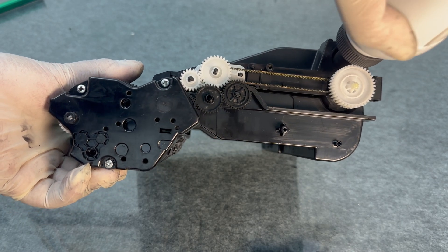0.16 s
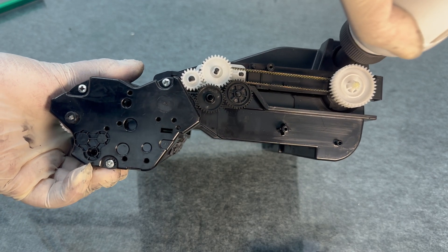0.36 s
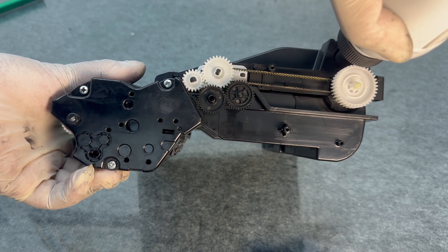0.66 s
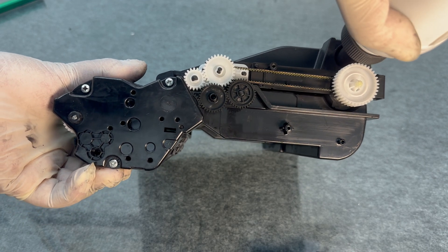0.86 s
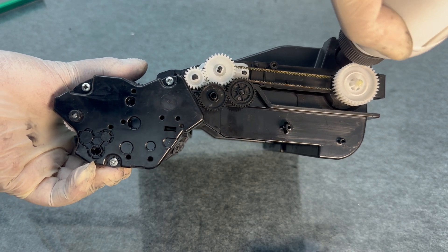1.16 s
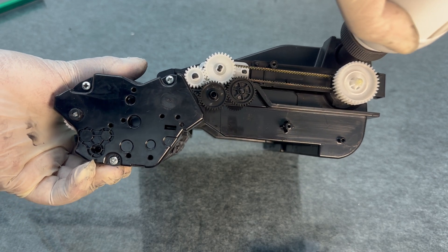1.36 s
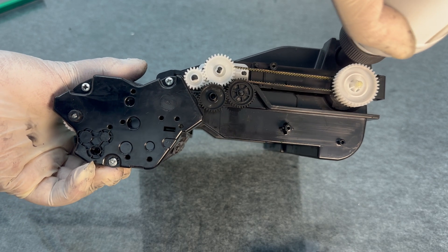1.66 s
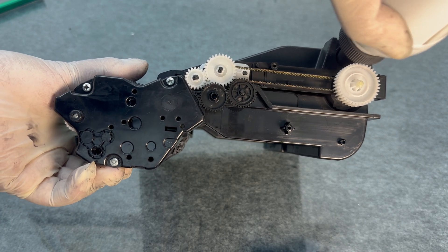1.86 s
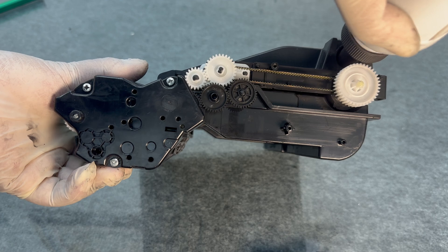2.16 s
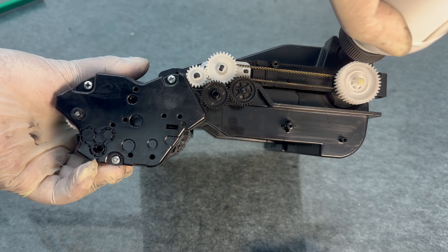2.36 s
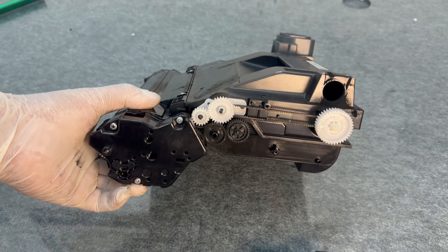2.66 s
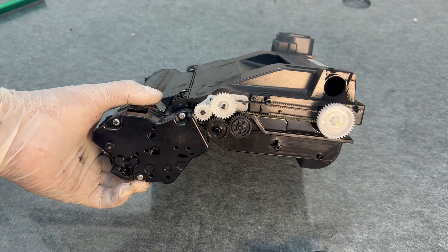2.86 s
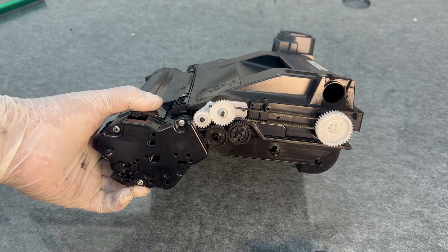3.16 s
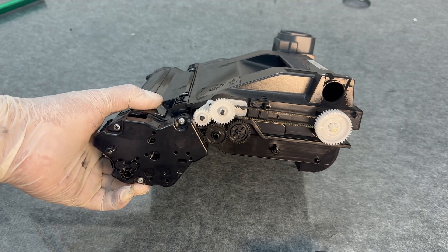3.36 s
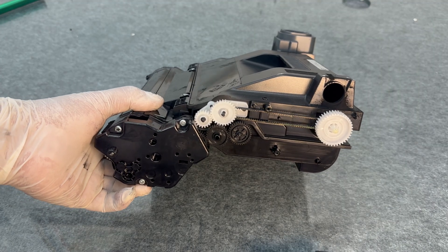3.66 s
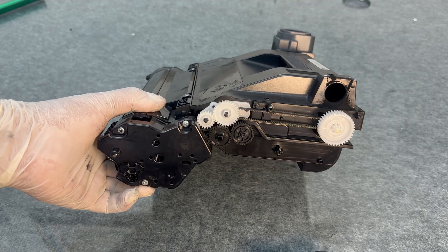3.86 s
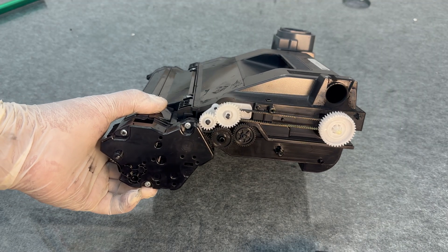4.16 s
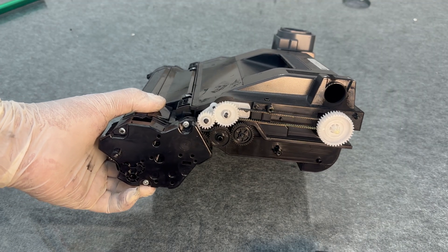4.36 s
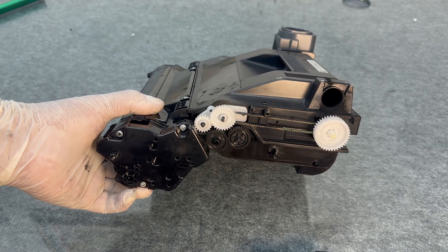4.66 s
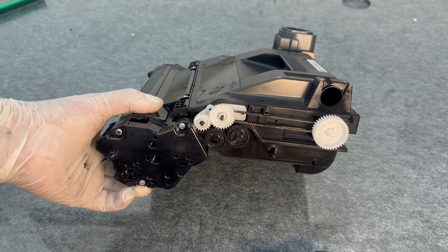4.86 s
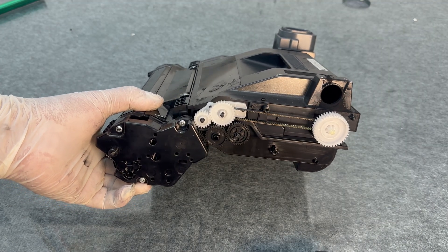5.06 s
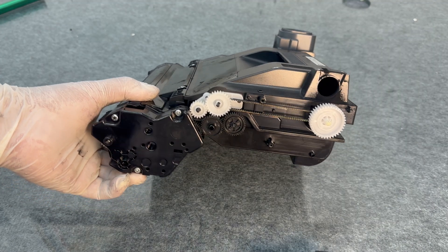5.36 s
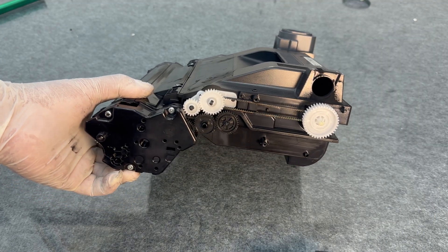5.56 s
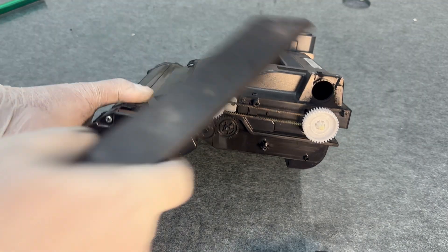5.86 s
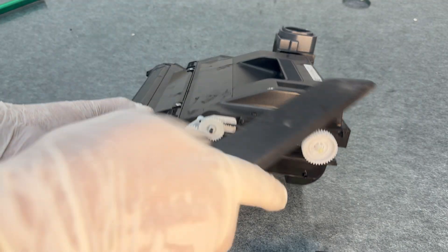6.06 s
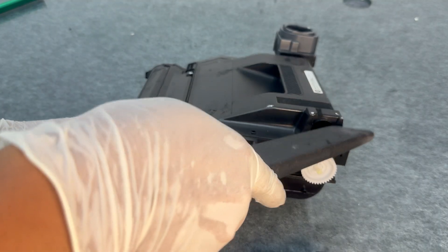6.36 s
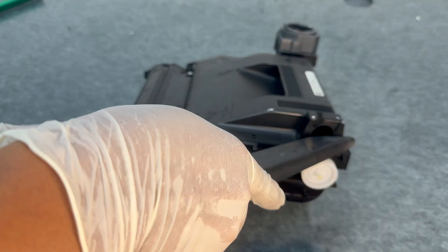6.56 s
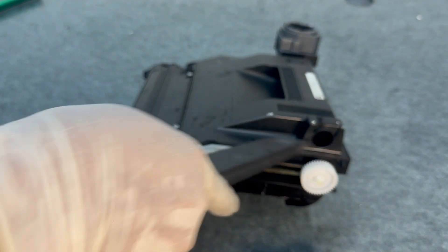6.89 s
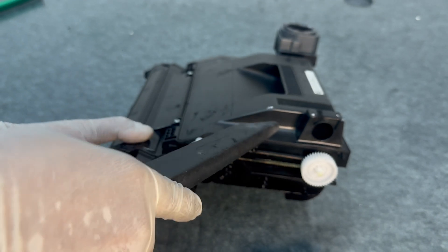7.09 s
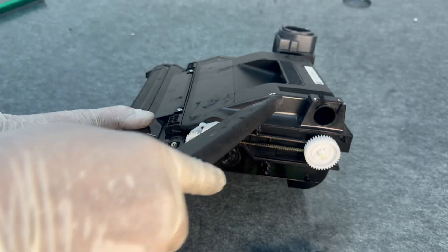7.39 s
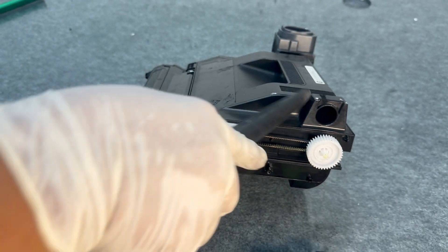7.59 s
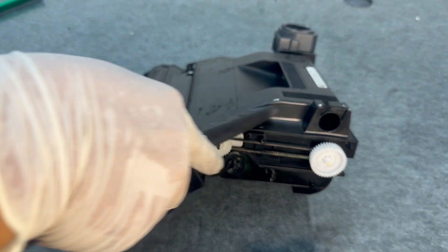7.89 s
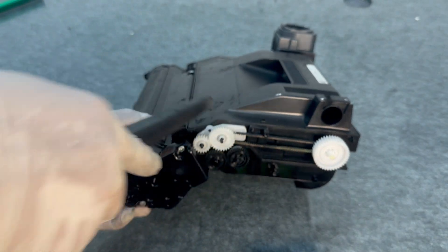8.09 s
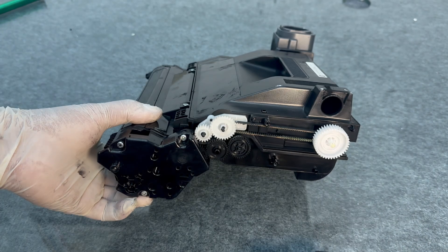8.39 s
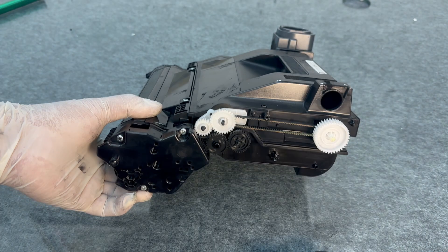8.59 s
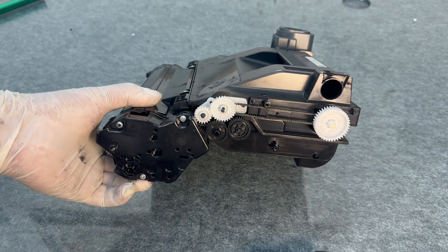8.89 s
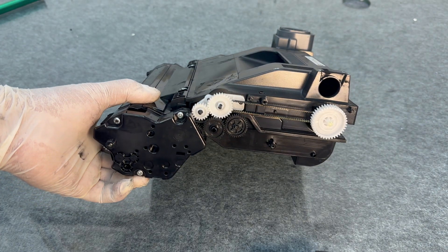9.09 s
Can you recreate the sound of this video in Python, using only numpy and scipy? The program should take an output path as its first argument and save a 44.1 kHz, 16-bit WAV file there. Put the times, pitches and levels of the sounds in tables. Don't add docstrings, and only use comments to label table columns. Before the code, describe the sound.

A close mono microphone in a quiet, slightly reflective small room. From 0 to 2.5 seconds a finger taps a hollow plastic bottle quickly, about eight times a second, hard and soft, with small rebounds, low airy thuds and fine powder rattling; taps weaken around 1 second, then strengthen. The tapping stops dead at 2.5. Faint room hush follows, with soft dull knocks near 3.2 and 3.8. At 4.1 a switch clunks and a small vacuum motor spins up, its hum and whine climbing for about a second amid roaring, hissing air; a small bump lands at 4.8. The hiss grows brighter as the nozzle approaches. At 6.6 to 6.9 it sucks on an edge with a breathy whistle, slides along, then at 7.7 chokes harder with a rapid fluttering squeal, fading by 8. The airflow softens as it lifts away, with a hollow bump at 9.1 while the motor still runs.

```python
import sys
import numpy as np
from scipy import signal
from scipy.fft import rfft, irfft, next_fast_len
from scipy.io import wavfile
from scipy.ndimage import uniform_filter1d, map_coordinates

SR = 44100
rng = np.random.default_rng(int(sys.argv[2]) if len(sys.argv) > 2 else 0)


def volts_from_db(level):
    exponent = np.asarray(level, float) / 20
    return 10 ** exponent


def master_out(mix):
    frames = np.transpose(np.atleast_2d(mix))
    ceiling = np.clip(frames, -1, 1)
    pcm = np.round(ceiling * 32767).astype(np.int16)
    wavfile.write(sys.argv[1], SR, pcm)


N = 407043

# start_s, shell_db, thud_under_shell_db (a flatter finger gives more thud)
STRIKES = [(0.268, -37.5, -10), (0.405, -43, -9), (0.5298, -42, -13), (0.662, -42.5, -11),
           (0.7893, -44.5, -11.5), (0.918, -50, -8), (1.049, -48.5, -13), (1.159, -42, -9),
           (1.292, -39.5, -11.5), (1.4276, -40, -10), (1.5551, -40.5, -9.5), (1.827, -40.5, -10.5),
           (1.955, -40, -9.5), (2.0884, -40, -9.5), (2.2258, -37.5, -11.5), (2.36, -40.5, -10)]
# start_s, shell_db
REBOUNDS = [(0.0014, -58.5), (0.1183, -59), (0.193, -50.5), (0.3349, -45.5), (0.471, -56), (0.583, -60),
            (0.72, -55), (0.828, -63), (0.963, -60), (1.093, -53), (1.22, -50.5), (1.361, -54.5),
            (1.488, -52.5), (1.619, -58), (1.751, -55.5), (1.8843, -54), (2.0294, -57.5), (2.155, -47),
            (2.2975, -53), (2.43, -54.5)]
# delay_s, level_db
BOTTLE_BOUNCES = [
    (0.0009, -0.5),
    (0.0059, -1.5),
    (0.0092, -1),
]
# pitch_hz, width_hz, level_db
BOTTLE_WALL = [(548, 26, -3), (906, 51, 1.5), (1263, 102, -6.5), (1610, 110, -5.5), (1880, 232, 1),
               (2075, 336, 2.5), (2356, 190, 1), (2530, 190, -1.5)]
# pitch_hz, width_hz, level_db
UPPER_WALL = [(3000, 350, -5.5), (3740, 360, -4), (4320, 420, -11.5), (5530, 1100, -10),
              (8000, 1200, -31.5)]
# pitch_hz, width_hz, level_db
BOTTLE_AIR = [(130, 45, 2), (206, 100, -1), (360, 138, 1), (534, 40, -14.5)]
TAPPING_ENDS_S = 2.465

SWITCH_ON_S, TOP_SHAFT_HZ = 4.1, 374.6
# missing_hz, time_constant_s
RUN_UP = [
    (177.54, 0.19),
    (134.5, 0.55),
]
# time_s, unbalance_db, low_tones_db, fan_over_low_tones_db
MOTOR_LEVELS = [(4.1, -85.5, -80, -9), (4.24, -60, -64, -9), (4.3, -63, -61, 1), (4.38, -64, -43, -4.5),
                (4.48, -47.5, -50.5, 5.5), (4.68, -45.5, -51.5, -1.5), (4.84, -47, -52, 4),
                (4.98, -38, -48, -1), (5.22, -44, -58, 0), (5.36, -40, -61.5, 8), (5.52, -49.5, -56, -9),
                (5.75, -56, -60, 9), (5.95, -63, -60, -4), (6.12, -58, -59, 3), (6.3, -50.5, -56.5, 7),
                (6.5, -50, -52, 2), (7.0, -46.5, -61, -3), (8.2, -47.5, -56, -2), (8.5, -49.5, -61, -20),
                (9.23, -50, -51, -10.5)]
# multiple_of_shaft, level_db
LOW_ORDERS = [(3, -4.5), (4, -12)]
# multiple_of_shaft, level_db
BLADE_ORDERS = [(8, -14), (9, -0.5)]
# time_s, second_order_db, bearing_db
WARBLE = [(4.25, -75, -80), (4.38, -50, -75), (4.47, -60, -70), (4.62, -50.5, -62), (4.72, -54, -58),
          (4.82, -53, -51), (4.92, -60, -58), (5.04, -59, -47), (5.2, -63, -60), (5.4, -69, -64),
          (5.8, -66, -65.5), (6.5, -59, -58), (7.6, -81, -59), (8.2, -72, -55.5), (9.23, -68, -66)]
# time_s, level_db
VANES = [(4.16, -80), (4.3, -70), (4.36, -60), (4.43, -66), (4.51, -56), (4.58, -63), (4.7, -64),
         (4.8, -60), (4.92, -55), (5.07, -53), (5.12, -64), (5.3, -85)]
# pitch_hz, width_hz, level_db
HOUSING = [(487, 40, -2), (646, 18, 12), (856, 20, 9.5), (915, 18, 8), (960, 22, 5), (1106, 54, 3),
           (1680, 50, 15), (2304, 34, 10), (2730, 580, 2.5), (2885, 140, 11.5), (3250, 270, 6),
           (3900, 290, 8), (5200, 150, -11)]

# time_s, nozzle_nearness_db, exhaust_nearness_db, nozzle_aim_at_microphone_db
AIRFLOW = [(4.1, -64, -65, 0), (4.18, -65, -49.5, -3), (4.23, -64, -56.5, 3), (4.31, -62.5, -55.5, 3.5),
           (4.58, -56, -56, -1), (4.84, -53, -54, -2.5), (5.0, -49, -54.5, -1.5), (5.4, -51, -56, -2),
           (5.76, -51, -54, 2), (6.2, -48, -49, 2), (6.5, -45.5, -49, -4.5), (7.0, -47.5, -51.5, -1.5),
           (7.2, -45, -50.5, -0.5), (7.66, -48.5, -49.5, 2), (8.03, -44.5, -49.5, 4), (8.21, -48, -53, 2.5),
           (8.7, -51, -54.5, 1), (9.23, -55, -56.5, -1)]
# pitch_hz, level_db_per_hz
ROAR = [(35, -49), (60, -17), (319, -3.5), (375, -5), (417, -2.5), (569, -6.5), (818, -10.5), (1100, -11),
        (1230, -15), (1500, -22), (1950, -40), (3300, -120)]
# pitch_hz, level_db_per_hz
RUSH = [(700, -12.5), (1000, -2), (1250, -1.5), (1500, -4.5), (1850, -1.5), (2400, -1.5), (3100, -8),
        (4200, -7.5)]
# pitch_hz, level_db_per_hz
HISS = [(1800, -27), (2800, 3), (3500, 0.5), (5000, 1.5), (6500, 0.5), (8500, -5), (11000, -22),
        (14000, -44)]
# pitch_hz, level_db_per_hz
FIZZ = [(6500, 1), (8500, 4), (11000, -1), (13000, -7), (16000, -36)]
# pitch_hz, level_db_per_hz
SHEEN = [(11500, -23), (13000, -4), (15000, -1), (16500, -10)]
# pitch_hz, width_hz, level_db
HOSE = [(457, 58, 0.5), (677, 150, -3), (863, 49, 3), (1110, 61, -1), (1360, 70, -7), (1740, 160, -3.5),
        (2120, 70, -10.5), (2520, 92, -4), (3000, 120, -15), (3350, 110, -3.5), (4240, 175, -4.5),
        (4850, 90, -12.5), (5560, 130, -12.5), (6360, 83, -10)]

# time_s, whistle_db, gap_shape (0 early, 1 late), choke_db
FIRST_SUCK = [(6.55, -73, 0.084, 3), (6.6, -49, 0.017, 6), (6.63, -36.5, 0.015, 9), (6.67, -33, 0.092, 10),
              (6.72, -34, 0.24, 10.5), (6.77, -33.5, 0.89, 11), (6.84, -38.5, 0.96, 8),
              (6.87, -56, 0.87, 8.5), (6.96, -61, 0.54, 4.5), (6.99, -58, .9, 1.5)]
# pitch_hz, width_hz, level_db
FIRST_GAP = ([(1070, 230, -9), (3380, 380, -6), (5110, 93, 5), (5650, 87, 3.5), (6150, 180, -2),
             (7700, 82, -4), (8700, 73, -24)], [(3500, 150, -3), (5280, 130, -8), (5830, 160, 4),
             (6300, 130, -0.5), (7450, 160, -2), (7730, 130, 0), (8400, 200, -1), (8800, 250, -9),
             (9600, 300, -24)])
# time_s, whistle_db, gap_shape (0 early, 1 late), choke_db
SECOND_SUCK = [(7.62, -45.5, 0, 1.4), (7.67, -42, 0, 4.5), (7.69, -32.5, 0.12, 10),
               (7.705, -30, 0.096, 16.3), (7.73, -27.5, 0, 14.4), (7.752, -28, 0.089, 16),
               (7.76, -28.5, 0.088, 14.4), (7.79, -34.5, 0.16, 12.8), (7.86, -34.5, 0.96, 6.6),
               (7.98, -36, 0.4, 3.8), (8.03, -56, 0.92, 0.91)]
# pitch_hz, width_hz, level_db
SECOND_GAP = [(1310, 420, -20), (2065, 120, -3.5), (3350, 27, -5), (3690, 15, 1), (3755, 260, 6),
              (4730, 150, 1.5), (5630, 110, -3)], [(1170, 560, -9), (2280, 110, 0.5), (3030, 65, -7),
              (3840, 180, 4), (4140, 94, 1.5), (4680, 54, -6), (5220, 76, 1), (6300, 86, -3),
              (6670, 76, -2)]
# time_s, mouth_db, gap_shape
ARRIVE = [
    (5.3, -67, -3),
    (5.5, -56, 1.5),
    (5.65, -55, -0.5),
    (5.78, -52.5, 3),
    (5.9, -56, 2),
    (6.05, -64, 4),
]
# pitch_hz, width_hz, level_db
ARRIVE_NOTES = ([(2280, 60, 0), (2850, 69, -9), (4180, 60, 3), (4550, 88, -3)], [(1970, 46, -7),
                (2700, 100, -3), (3260, 60, -10), (4320, 68, 5), (5070, 82, 3)])
# time_s, mouth_db, gap_shape
SWING = [
    (5.9, -64, 1),
    (6.1, -49, 0),
    (6.25, -50.5, 0.5),
    (6.45, -44, 2),
    (6.58, -46.5, 1),
    (6.66, -41, 1),
]
# pitch_hz, width_hz, level_db
SWING_NOTES = ([(1800, 110, -1), (2604, 160, -14), (3550, 390, 2), (5300, 200, 0), (13900, 2500, -7)],
               [(1820, 80, -7), (2560, 98, 0), (3170, 200, -5), (5050, 190, -3.5), (5840, 170, -1),
               (14200, 2500, -23)])
# time_s, mouth_db, gap_shape
SLIDE = [
    (6.82, -64, -4),
    (6.88, -41.5, -7),
    (6.96, -44.5, 1.5),
    (7.0, -51, -1),
    (7.1, -52.5, 2.5),
    (7.3, -50.5, -0.3),
    (7.45, -53, .95),
    (7.58, -47.5, 6),
    (7.66, -48, -3),
]
# pitch_hz, width_hz, level_db
SLIDE_NOTES = ([(1840, 170, -2.5), (3280, 49, 0), (3920, 66, 0), (4450, 80, -2), (5070, 200, -6),
               (7200, 140, -16), (10600, 60, -14)], [(1740, 170, -7), (2300, 110, 2), (2500, 86, -8),
               (3460, 80, -1), (4140, 46, 4), (4490, 95, 4), (8840, 150, -13)])
# time_s, mouth_db, gap_shape
LIFT = [
    (7.98, -57, -4),
    (8.06, -48, -1.5),
    (8.2, -54, 0.5),
    (8.38, -52, -0.5),
    (8.5, -63, 10),
    (8.8, -59, .9),
    (9.2, -62, 4),
]
# pitch_hz, width_hz, level_db
LIFT_NOTES = ([(1820, 130, -5), (2480, 170, -3), (3380, 34, -2), (4440, 120, -5), (4940, 90, -1),
              (5400, 110, -3), (7100, 60, -6)], [(1750, 82, -10), (2540, 94, 1), (3240, 80, 6),
              (4520, 140, 2)])
# start_s, peak_db
LIP_SNAPS = [(7.7024, -16.5), (7.712, -17), (7.7197, -17), (7.7254, -21), (7.7344, -21), (7.7414, -20),
             (7.751, -20), (7.7614, -21), (7.772, -16), (7.776, -23), (7.7834, -26), (7.7957, -24),
             (7.8183, -23)]
# pitch_hz, width_hz, level_db
LIP_RING = [(3250, 300, -6), (3820, 180, 1), (4800, 300, -1.5), (6500, 2500, -17.5)]

# start_s, level_db, length_s, darkness_db_per_octave
CAP = (850, 8.3), [(0.057, -60, 0.033, 12), (0.086, -56, 0.027, 8.5), (1.816, -58.5, 0.048, 4)]
RIM = (3400, -2.3), [(1.011, -56, .012, 3.1), (1.029, -65, .012, 2.5)]
CARTRIDGE = (540, -2.9), [(1.03, -54.5, 0.085, 9.4), (1.733, -60, 0.071, 9.5), (3.226, -55.5, 0.2, 10.7),
             (3.78, -71, .04, 4), (3.814, -55.5, 0.13, 10.6)]
DESK = (220, 4.7), [(3.318, -63.5, 0.38, 17), (3.796, -55.5, 0.17, 8.5), (4.192, -59, .02, 6),
        (4.76, -45, .07, 3.6)]
SWITCH = (550, -14), [(4.09, -51.5, 0.14, 1.9)]
LID = (1040, -4), [(4.137, -41.5, 0.1, 11)]
CASING = (111.4, 1.9), [(4.103, -45, 0.15, 9.6), (4.121, -41, 0.082, 9.2), (9.121, -43, 0.12, 5.8)]
TRAY = (237, 12.4), [(9.113, -45, 0.061, 7.3)]
PANEL = (1780, 16), [(4.198, -62, 0.12, 6)]
GRILLE = (2260, 14), [(4.228, -61.5, 0.13, 6)]

# delay_s, level_db
EARLY_ECHOES = [(0.016, -25), (.018, -4.5), (0.027, -35), (.031, -7.5), (0.039, -10)]
# pitch_hz, time_to_fall_60_db_s
ROOM_DECAY = [(100, 1), (500, 0.21), (2000, 0.28), (8000, 0.13)]
# pitch_hz, level_db_per_hz
HUSH = [(12, -46), (20, -15), (48, -3.5), (71, -13), (142, -14.5), (227, -10.5), (260, -12.5), (283, -14),
        (518, -23), (1150, -29.5), (1650, -37), (4460, -47.5), (4840, -47.5), (6210, -51), (14600, -56)]
# pitch_hz, level_db
FAR_WHINES = [(2169, -101), (4753, -100), (5265, -102)]


def unit(x):
    return x / np.sqrt(np.mean(x ** 2) + 1e-20)


def along(points, hz):
    f, v = np.transpose(points)
    return np.interp(np.log(hz + 1), np.log(f + 1), v)


def curves(rows):
    s, *columns = np.transpose(rows)
    t = np.arange(N) / SR
    gate = np.clip((t - s[0]) * 200, 0, 1) * (t <= s[-1] + 0.01)
    return [np.interp(t, s, column) for column in columns] + [gate]


def wobble(rate):
    knots = rng.standard_normal(int(N * rate / SR) + 4)
    return map_coordinates(knots, [np.arange(N) * rate / SR])


def filtered(x, response):
    m = next_fast_len(len(x) + SR // 2)
    return irfft(rfft(x, m) * response(np.fft.rfftfreq(m, 1 / SR)), m)[:len(x)]


def resonances(modes, turn=-1):
    def response(f):
        total = 0
        for k, (centre, width, db) in enumerate(modes):
            damping = 1j * f * width
            total = total + turn ** k * volts_from_db(db) * damping / (centre * centre - f * f + damping)
        return total
    return response


def air(spectrum, patchy_db):
    z = signal.stft(rng.standard_normal(N + 512), nperseg=512)[2]
    patches = uniform_filter1d(rng.standard_normal(z.shape), size=2, axis=0)
    patches = uniform_filter1d(patches, size=24, axis=1)
    x = signal.istft(z * volts_from_db(patchy_db * unit(patches)), nperseg=512)[1][:N]
    lowest, highest = spectrum[0][0], spectrum[-1][0]
    return unit(filtered(x, lambda hz: volts_from_db(along(spectrum, hz)) * (hz > lowest) * (hz < highest)))


def room(x, tail_db, early_db):
    hz, t, z = signal.stft(rng.standard_normal(SR // 2), SR, nperseg=256)
    decay = volts_from_db(-60 * t / along(ROOM_DECAY, hz)[:, None])
    tail = signal.istft(z * decay, SR, nperseg=256)[1]
    tail *= np.clip(np.arange(len(tail)) / SR / 0.011, 0, 1)
    answer = volts_from_db(tail_db) * tail / np.linalg.norm(tail)
    answer[0] += 1
    for delay_s, db in EARLY_ECHOES:
        answer[round(delay_s * SR)] += volts_from_db(db + early_db)
    return signal.fftconvolve(x, answer)[:len(x)]


def taps():
    n = round(TAPPING_ENDS_S * SR) + SR // 4
    t = np.arange(SR // 4) / SR
    contact, hard, push = np.zeros((2, n)), np.zeros(n), np.zeros(n)
    swell = np.sin(np.pi * np.minimum(t / 0.014, 1) ** 0.47) ** 2
    rise = np.clip((t - 0.006) / (0.014 - 0.006), 0, 1) ** 2
    touch = volts_from_db(-60 * t / 0.00051)
    rows = [(s, db, volts_from_db(db + thud_db)) for s, db, thud_db in STRIKES]
    rows += [(s, db, -volts_from_db(-57 + 0.71 * (db + 54.5))) for s, db in REBOUNDS]
    rows.sort()
    for (s, db, thud), (grit_noise, sand) in zip(rows, rng.standard_normal((len(rows), 2, len(t)))):
        k = round(s * SR)
        scrape = 0.36 * grit_noise * swell * volts_from_db(-60 * t / 0.026)
        tick = 0.18 * volts_from_db(0.4 * (db + 33) - 60 * abs(t - 0.0042) / 0.000088)
        rattle = touch + scrape + tick
        grains = sand * rise * volts_from_db(2.5 * unit(uniform_filter1d(grit_noise, size=100)))
        wall_grains = grains * volts_from_db(-18 - 60 * t / 0.21)
        upper_grains = grains * volts_from_db(-16.5 - 60 * t / 0.17)
        grip = np.pi / 4 * (1 + np.tanh(3 * sand[0]))
        hands = [np.cos(grip), np.sin(grip)]
        contact[:, k:k + len(t)] += np.outer(hands, volts_from_db(db + 19.0) * (rattle + wall_grains))
        hard[k:k + len(t)] += volts_from_db(db + 13.5 + 0.32 * (db + 37.5)) * (rattle + upper_grains)
        for after_s, bounce_db in BOTTLE_BOUNCES:
            push[k + round(after_s * SR):][:100] -= thud * volts_from_db(10.5 + bounce_db) * np.hanning(100)

    def wall(shift):
        return lambda hz: resonances(BOTTLE_WALL)(hz / shift) + 0.1 / (1 + 1j * hz / 4000)

    squeeze = 1.035
    heard = filtered(contact[0], wall(1 / squeeze ** 0.5)) + filtered(contact[1], wall(squeeze ** 0.5))
    heard = heard + filtered(hard, resonances(UPPER_WALL))
    heard = heard + room(filtered(push, resonances(BOTTLE_AIR, turn=1)), tail_db=-16, early_db=-10)
    soft_hz = 10500
    heard = filtered(heard, lambda hz: 1 / (1 - (hz / soft_hz) ** 2 + 1.1j * hz / soft_hz) ** 2)
    stop = np.clip((TAPPING_ENDS_S - np.arange(n) / SR) * 200, 0, 1)
    return np.pad(heard * stop, (0, N - n))


def shaft():
    since = np.maximum(np.arange(N) / SR - SWITCH_ON_S, 0)
    return TOP_SHAFT_HZ - sum(hz * np.exp(-since / tau) for hz, tau in RUN_UP)


def motor():
    unbalance_db, low_db, fan_db, on = curves(MOTOR_LEVELS)
    blade_db = low_db + fan_db
    turn = 2 * np.pi * np.cumsum(shaft()) / SR

    def tone(k, db, drift):
        level = volts_from_db(db + 2.0 + drift * 4.5 * wobble(26))
        shudder = 0.084 * wobble(150) + 0.079 * wobble(35)
        return level * np.sin(k * turn + drift * wobble(40) + k * shudder)

    low = sum(tone(k, low_db + db - 3.5, drift=0.39) for k, db in LOW_ORDERS)
    blades = sum(tone(k, blade_db + db - 7.0, drift=0.68) for k, db in BLADE_ORDERS)
    second_db, bearing_db, heard = curves(WARBLE)
    pair = heard * (tone(2, second_db, drift=0.29) + tone(2.612, bearing_db, drift=0.25))
    vane_db, singing = curves(VANES)
    vanes = singing * tone(12, vane_db, drift=0.5)
    ring = filtered(on * (low + blades), lambda hz: 0.28 + resonances(HOUSING)(hz))
    unbalance = on * tone(1, unbalance_db, drift=0.3)
    return unbalance + pair + vanes + room(ring, tail_db=-10, early_db=-12)


def flow():
    nozzle_db, exhaust_db, aim_db, on = curves(AIRFLOW)
    speed_db = 20 * np.log10(shaft() / TOP_SHAFT_HZ)
    puff_db = 10.5 * np.clip(1 - (np.arange(N) / SR - SWITCH_ON_S) / 0.078, 0, 1)
    first_db, second_db = curves(FIRST_SUCK)[2], curves(SECOND_SUCK)[2]
    choke_db = first_db + second_db
    rush_db = -51.5 + 1.8 * np.minimum(speed_db + 2.5, 0) + 0.078 * np.minimum(nozzle_db + 58.5, 0)
    rush_db = rush_db + 0.71 * (exhaust_db + 49.0) + 8 * np.tanh(choke_db / 4) + 0.81 * puff_db
    fizz_db = nozzle_db + aim_db - 10 + 0.93 * speed_db
    fizz_db = fizz_db + 1.93 * first_db + 0.27 * second_db + 1.8 * puff_db
    sheen_db = fizz_db - 13.5 + 0.32 * (fizz_db + 54) + 0.86 * speed_db + 0.7 * puff_db
    flicker = wobble(30)
    roar = volts_from_db(exhaust_db - 0.38 * choke_db + 6.0) * air(ROAR, patchy_db=1.5)
    rush = volts_from_db(rush_db + 1.4 * flicker) * air(RUSH, patchy_db=1.5)
    hiss = volts_from_db(nozzle_db + choke_db + puff_db + 0.4 * flicker) * air(HISS, patchy_db=0.7)
    fizz = volts_from_db(fizz_db + 2 + 0.4 * flicker) * air(FIZZ, patchy_db=1.8)
    sheen = volts_from_db(sheen_db) * air(SHEEN, patchy_db=-2)
    streams = roar + rush + hiss + fizz + sheen
    hose = on * filtered(streams, lambda hz: 0.57 + 0.5 * abs(resonances(HOSE)(hz)))
    moved = wobble(1.3)
    places = np.cos(moved) * hose, np.sin(moved) * hose
    return hose + sum(room(part, tail_db=-8.5, early_db=-13) - part for part in places)


def whistle(suck, gap):
    level_db, share, *_, on = curves(suck)
    heard = on > 0
    share = np.clip(share, 0, 1)[heard]
    jet = (rng.standard_normal(N) * volts_from_db(1.16 * wobble(130)))[heard]
    early, late = (unit(filtered(jet, resonances(modes))) for modes in gap)
    out = np.zeros(N)
    out[heard] = (on * volts_from_db(level_db))[heard] * (np.sqrt(1 - share) * early + np.sqrt(share) * late)
    return out


def lip_flutter():
    blows, t = np.zeros(N), np.arange(200) / SR
    for (s, db), puff in zip(LIP_SNAPS, rng.standard_normal((len(LIP_SNAPS), len(t)))):
        blows[round(s * SR):][:len(t)] += volts_from_db(db + 13 - 60 * t / 0.0033) * puff
    return filtered(blows, resonances(LIP_RING))


def knocks():
    out, t = np.zeros(N + SR), np.arange(SR // 2) / SR
    hz = np.fft.rfftfreq(len(t), 1 / SR)
    parts = CAP, RIM, CARTRIDGE, DESK, SWITCH, LID, CASING, TRAY, PANEL, GRILLE
    rows = sorted(bump + part for part, bumps in parts for bump in bumps)
    for row, noise in zip(rows, rng.standard_normal((len(rows), len(t)))):
        s, db, length, dark_db, hollow_hz, hollow_db = row
        colour = volts_from_db(-dark_db * np.log2(1 + hz / 250)) * (hz / (hz + 90)) ** 2 / (1 + (hz / 7000) ** 4)
        bump = unit(irfft(rfft(noise) * colour, len(t)))
        unsteady = 0.85 * unit(uniform_filter1d(noise, size=300))
        note = np.sin(2 * np.pi * hollow_hz * t + unsteady)
        fade = volts_from_db(-30 * t / length) * (1 - np.exp(-t / 0.0028))
        out[round(s * SR):][:len(t)] += volts_from_db(db) * (bump + volts_from_db(hollow_db) * note) * fade
    return out[:N]


def hush():
    t = np.arange(N) / SR
    whine = np.zeros(N)
    for hz, db in FAR_WHINES:
        level = volts_from_db(db + 3 + 1.2 * wobble(11))
        whine += level * np.sin(2 * np.pi * hz * t + 0.61 * wobble(23))
    return volts_from_db(-64.5 + 0.22 * wobble(2.6)) * air(HUSH, patchy_db=1.5) + whine


def scene():
    passes = [(FIRST_SUCK, FIRST_GAP), (SECOND_SUCK, SECOND_GAP), (ARRIVE, ARRIVE_NOTES),
              (SWING, SWING_NOTES), (SLIDE, SLIDE_NOTES), (LIFT, LIFT_NOTES)]
    whistles = sum(whistle(suck, gap) for suck, gap in passes)
    mono = taps() + motor() + flow() + whistles + lip_flutter() + knocks() + hush()
    return np.array([mono, mono])


def low_pass(x):
    return signal.sosfilt(signal.butter(12, 15750, fs=SR, output="sos"), x)


def record(dry):
    mono = filtered(dry[0], lambda hz: 1 / (1 + (33 / (hz + 1)) ** 6) * (hz < 15740))
    return low_pass(np.array([mono, mono]))


dry = scene()
out = record(dry)
master_out(out)
```